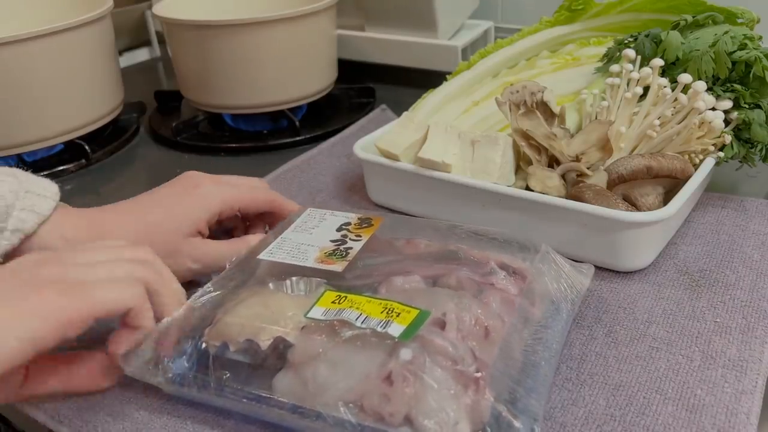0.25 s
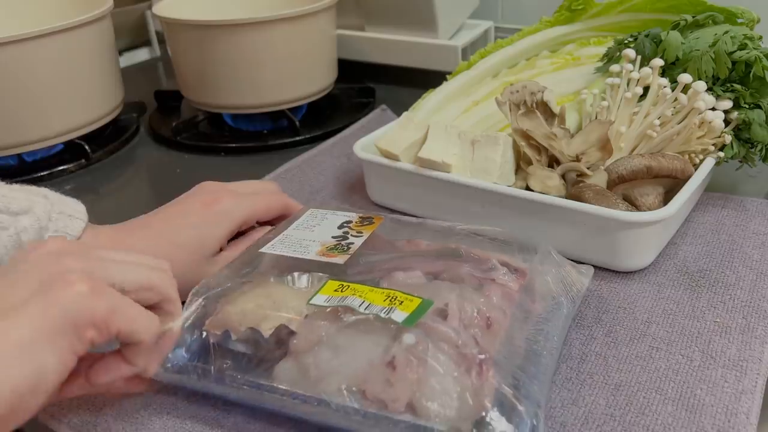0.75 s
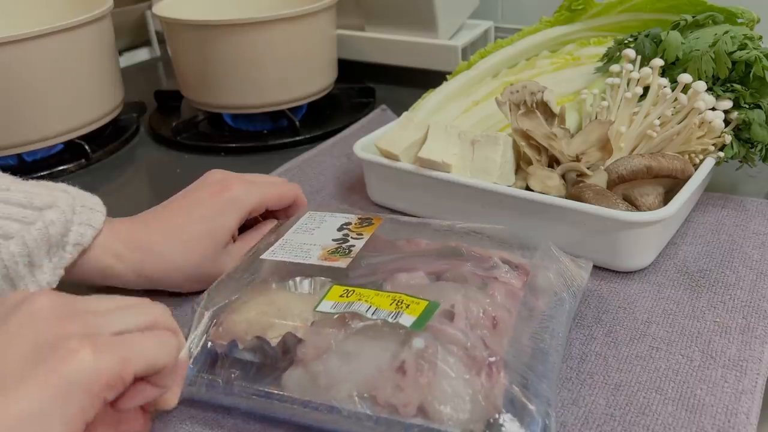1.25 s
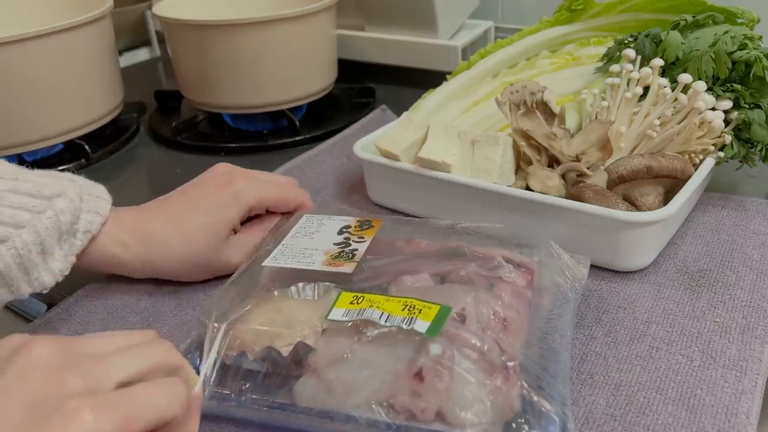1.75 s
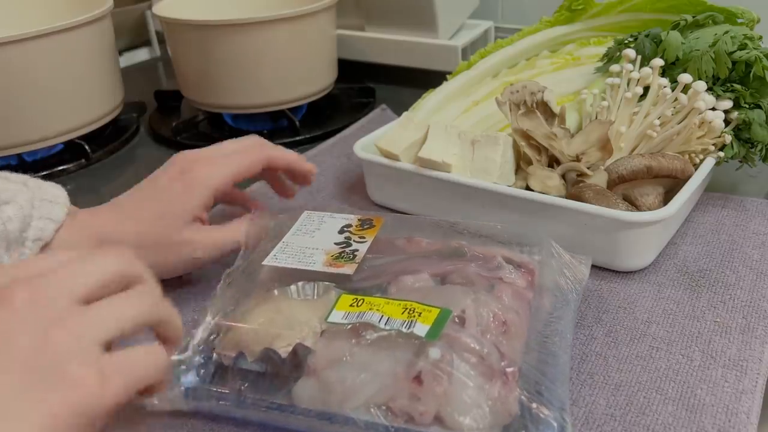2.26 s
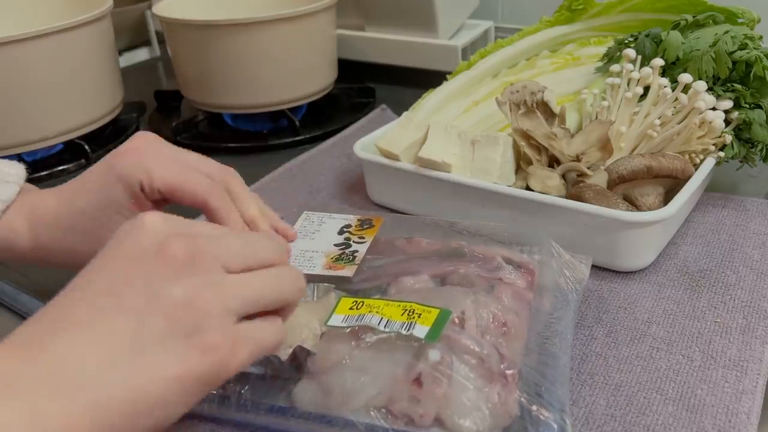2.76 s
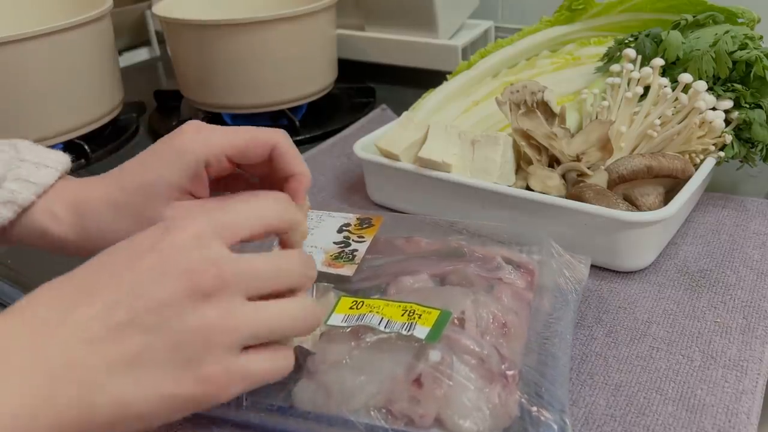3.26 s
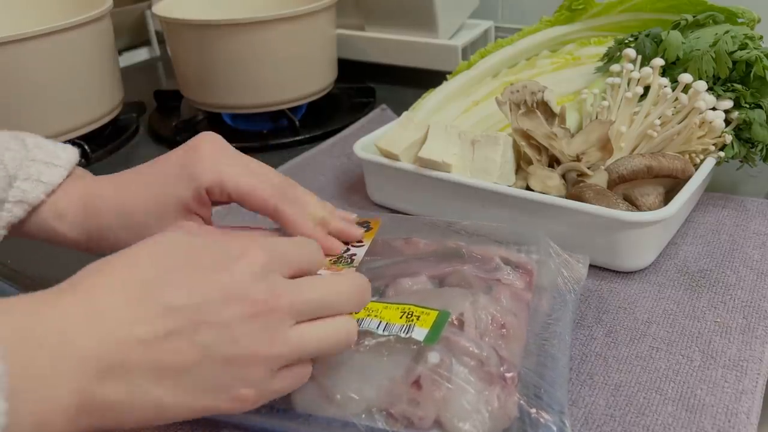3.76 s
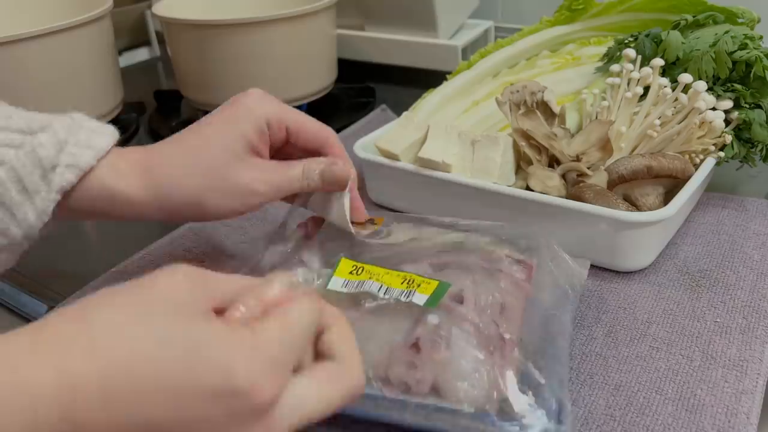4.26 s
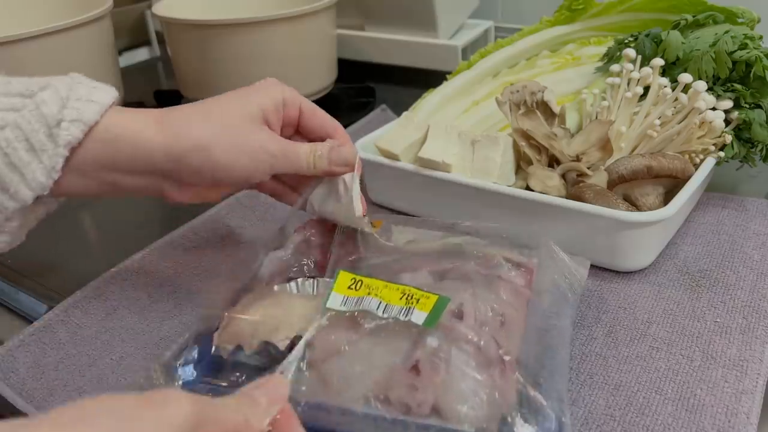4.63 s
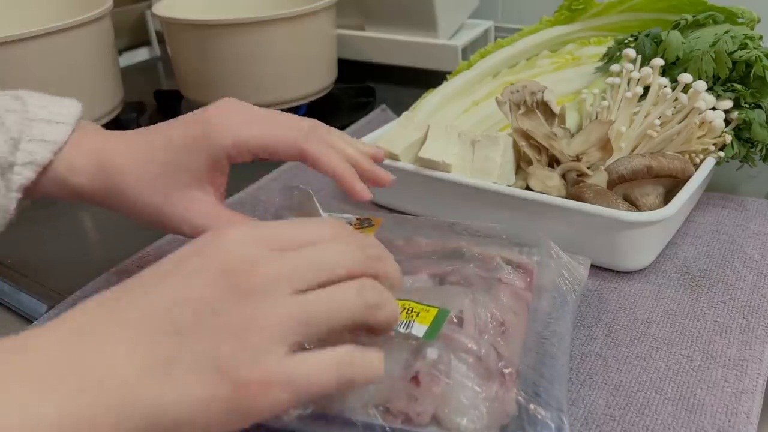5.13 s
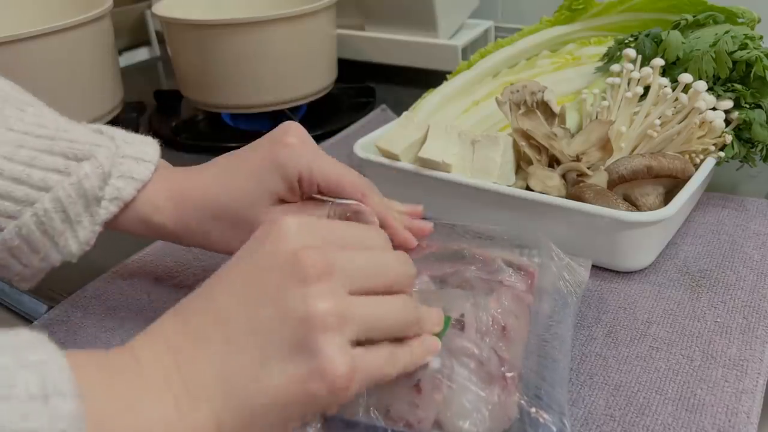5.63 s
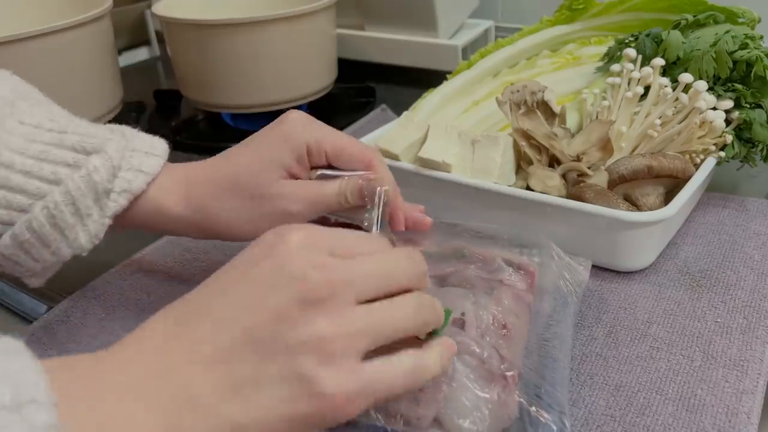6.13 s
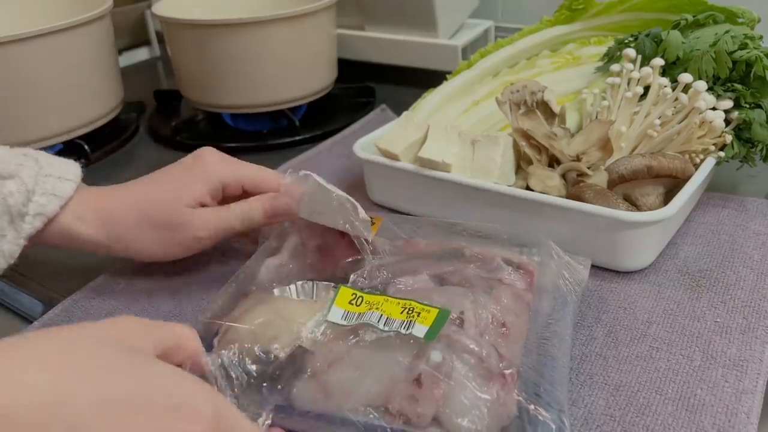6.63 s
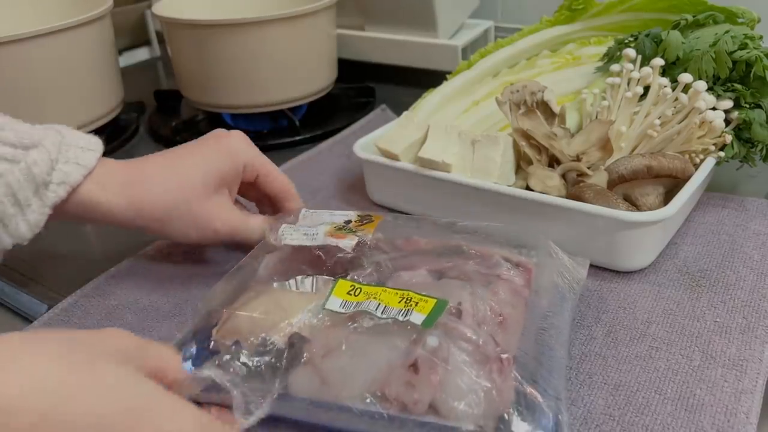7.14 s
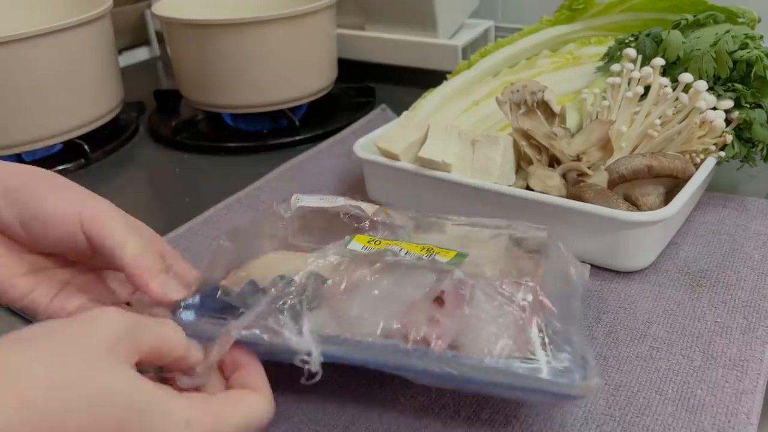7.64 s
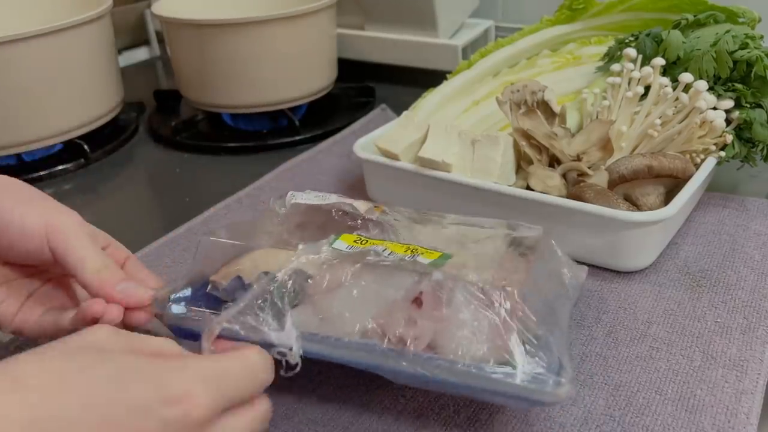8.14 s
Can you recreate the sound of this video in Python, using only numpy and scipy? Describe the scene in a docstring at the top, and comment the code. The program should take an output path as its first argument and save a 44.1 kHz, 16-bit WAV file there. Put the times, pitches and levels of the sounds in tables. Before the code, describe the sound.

Thin plastic wrap crackles brightly while the foam tray beneath rubs, creaks and knocks like a tiny drum. Irregular pulls come in clusters separated by lulls, with crisp snaps, soft fingertip taps, a very short rip and some deeper counter thuds. The sound sits near and slightly left, with a short dry kitchen reflection over quiet steady gas burners.

```python
"""Cling film on a foam tray

Fingers pick and pull at cling film stretched over a foam tray, heard close by on a kitchen counter.
Random slips crinkle the film and rub the tray; runs of impulses rip stuck film loose.
Each release is a film snap, a foam crack, a modal tray ring like a small drum and a thud on the counter.
Filtered noise makes soft gas burners behind; decaying noise tails make the small room's brief answer."""
import sys
import numpy as np
from scipy import signal
from scipy.fft import rfft, irfft, next_fast_len
from scipy.io import wavfile
from scipy.ndimage import uniform_filter1d

SR = 44100
rng = np.random.default_rng(int(sys.argv[2]) if len(sys.argv) > 2 else 0)


def wav_out(sig):
    """Save sig, one row per channel (or a flat mono array), as 16-bit PCM at SR to the path in sys.argv[1]."""
    wavfile.write(sys.argv[1], SR, np.round(np.clip(np.atleast_2d(sig).T, -1, 1) * 32767).astype(np.int16))


N = 369999


def amp(db):
    """Decibels to gain."""
    return 10 ** (np.asarray(db) / 20)


def unit(x):
    """x at rms 1."""
    return x / np.sqrt(np.mean(x ** 2) + 1e-20)


def blow(x):
    """A short sound with the energy of 10 ms at rms 1."""
    return x * np.sqrt(SR / 100 / (np.sum(x ** 2) + 1e-20))


def along(points, hz):
    """(f/Hz, value) points read on a log frequency axis."""
    f, v = np.transpose(points)
    return np.interp(np.log(hz + 1), np.log(f + 1), v)


def curve(rows):
    """(t/s, value) rows as one value per sample."""
    return np.interp(np.arange(N) / SR, *np.transpose(rows))


def filtered(x, response):
    """x times a response of frequency."""
    m = next_fast_len(N + SR // 2)
    hz = np.fft.rfftfreq(m, 1 / SR)
    return irfft(rfft(x, m) * response(hz), m)[..., :N]


def coloured(x, points, size=1024):
    """x through a causal minimum-phase filter with the given spectrum."""
    log_gain = np.log(amp(along(points, np.fft.rfftfreq(size, 1 / SR))))
    cepstrum = irfft(log_gain)
    cepstrum[1:size // 2] *= 2
    cepstrum[size // 2 + 1:] = 0
    impulse_response = irfft(np.exp(rfft(cepstrum)))
    return signal.oaconvolve(x, impulse_response)[:len(x)]


def add(track, s, sound):
    """Mix a sound into a track at s seconds."""
    room = track[round(s * SR):][:len(sound)]
    room += sound[:len(room)]


def burst(t, rise, t60):
    """Noise that flares up and dies; rise and t60 in s."""
    return rng.standard_normal(len(t)) * (1 - np.exp(-(t / rise) ** 2)) * amp(-60 * t / t60)


def click(t, rise, t60):
    """A buckle that runs across the film: burst phases over an even spectrum, then a gentler decay."""
    z = rfft(burst(t, rise, t60))
    even = irfft(z / (np.abs(z) + 1e-9), len(t))
    return even * amp(-15 * t / t60)


def slips(rate, spread_db, cap_db):
    """Irregular impulses of either sign, rate/Hz; sizes exponential in dB up to a cap."""
    size = amp(np.minimum(spread_db * rng.exponential(size=N), cap_db))
    struck = rng.random(N) < rate / SR
    return struck * size * rng.choice([-1, 1], N)


# gas flames and kitchen rumble, relative spectrum: f/Hz, level/(dB per Hz)
BURNER_SPECTRUM = [(20, -49.5), (32, -18), (55, -5), (105, -5), (130, -10), (260, -14.5), (700, -30.5),
                   (1150, -20.5), (1800, -21), (2300, -32.5), (5100, -32), (7000, -36.5), (16000, -38.5)]
# left-right likeness of the background: f/Hz, coherence
BURNER_COHERENCE = [(60, 0.98), (240, 0.85), (950, 0.09), (3770, 0.026), (15000, 0.1)]


def burners():
    """Steady gas flames and low kitchen rumble: coloured noise, mid and side weighted for coherence."""
    def mid_side_gains(hz):
        angle = np.arccos(np.clip(along(BURNER_COHERENCE, hz), -1, 1)) / 2
        return amp(along(BURNER_SPECTRUM, hz)) * [np.cos(angle), np.sin(angle)]

    mid, side = filtered(rng.standard_normal((2, N)), mid_side_gains)
    return amp(-57.13) * unit(np.array([mid + side, mid - side]))


# hands hold the wrap, interpolated: t/s, crinkle level/dB, rub level/dB (relative)
HOLDING = [(0, -62.5, -68.5), (1.1, -66, -69.5), (1.9, -78, -74.5), (3.6, -61, -62.5), (4.6, -63.5, -71.5),
           (5.1, -72, -69), (6.2, -62, -60), (7.5, -60, -65), (8.1, -70.5, -73)]
# a finger pulls at the wrap: t/s, length/s, crinkle level/dB, rub level/dB (relative)
PULLS = [(0.038, 0.11, -79, -59), (0.327, 0.04, -48.5, -47.5), (0.783, 0.047, -59, -56.5),
         (1.19, 0.035, -60.5, -63.5), (2.201, 0.099, -47.5, -52), (2.36, 0.018, -54, -53),
         (2.467, 0.12, -97, -59), (2.729, 0.037, -60, -60.5), (2.88, 0.05, -55, -53.5),
         (2.951, 0.055, -48.5, -49.5), (3.229, 0.07, -51, -56.5), (3.395, 0.079, -67, -57),
         (3.715, 0.42, -58.5, -67), (4.259, 0.066, -49.5, -44.5), (4.413, 0.1, -55, -66),
         (4.704, 0.22, -50, -63), (5.456, 0.32, -55.5, -57.5), (6.179, 0.038, -48.5, -46),
         (6.3, 0.023, -55, -49.5), (6.425, 0.16, -63, -53.5), (6.747, 0.1, -55.5, -51.5),
         (7.267, 0.092, -57, -59.5), (8.241, 0.11, -54, -54.5)]
GRIP_S, RELEASE_S, SLACKEN_DB = 0.028, 0.06, 4.5  # build-up, dying away, weakening over the pull


def effort():
    """Levels of crinkle and rub in dB: every pull grips, slackens and lets go, over the holding hands."""
    t = np.arange(N) / SR
    holding = np.array(HOLDING)
    power = np.array([amp(curve(holding[:, [0, k]])) ** 2 for k in (1, 2)])
    for s, length_s, crinkle_db, rub_db in PULLS:
        corners_s = [s - GRIP_S, s, s + length_s, s + length_s + RELEASE_S]
        shape = np.interp(t, corners_s, [0, 1, amp(-SLACKEN_DB), 0])
        power += np.outer(amp([crinkle_db, rub_db]), shape) ** 2
    return 10 * np.log10(power)


# foam tray modes, nominal: f/Hz, level/dB, t60/s
TRAY_MODES = [(276, -2.5, 0.076), (383, -4.5, 0.045), (529, -3, 0.029), (774, -2.5, 0.029),
              (920, -5, 0.023), (1108, -0.5, 0.034), (1209, 1, 0.019), (1500, 0.5, 0.0079)]


def tray_ring(t, pitch_hz, octaves, scatter_db, contact):
    """The tray's modes; the place of the blow favours those near one pitch, a slow contact draws them out."""
    hz, db, t60 = np.transpose(TRAY_MODES)[:, :, None]
    hz = hz * np.exp(0.046 * rng.standard_normal(hz.shape))  # the film's tension retunes the tray
    distance = np.abs(np.log2(hz / pitch_hz)) / octaves
    db = db + scatter_db * rng.standard_normal(hz.shape) - 6 * distance
    sign = (-1) ** np.arange(len(TRAY_MODES))[:, None]
    decay_s = 0.76 * t60 + 9 * contact
    modes = sign * amp(db - 60 * t / decay_s) * np.sin(2 * np.pi * hz * t)
    ring = modes.sum(axis=0) * (1 - np.exp(-(t / contact) ** 2))
    highpass = signal.butter(2, 280, "high", fs=SR, output="sos")  # too small to radiate bass
    return blow(signal.sosfilt(highpass, ring))


# cracking foam, relative spectrum: f/Hz, level/(dB per Hz)
CRACK_SPECTRUM = [(700, -36), (1500, 2), (2200, 1), (3200, -2.5), (4200, -11), (5200, -13.5), (7000, -25),
                  (16000, -58)]


def rub(creases, level_db, count=5):
    """Half of the slips happen under a finger: they tap the tray at one of several places and scrape."""
    t = np.arange(SR // 12) / SR
    place = rng.integers(2 * count, size=N)
    tray_taps = np.zeros(N)
    for k in range(count):
        ring = tray_ring(t, 800, octaves=1.3, scatter_db=-1.0, contact=0.00025)
        tray_taps += signal.oaconvolve(creases * (place == k), ring)[:N]
    drag = uniform_filter1d(np.abs(creases) * (place < count), size=SR // 200)  # each slip slides for 5 ms
    scrape = coloured(drag * rng.standard_normal(N), CRACK_SPECTRUM)
    return amp(level_db - 1.64) * (unit(tray_taps) + amp(-6.0) * unit(scrape))


# crinkling film, relative spectrum: f/Hz, level/(dB per Hz)
FILM_SPECTRUM = [(500, -14), (1500, -5), (2500, -2), (4000, -5.5), (5500, -2), (8800, 1), (10200, -8),
                 (11600, 3.5), (13600, -20), (15400, 0), (17000, -31)]


def crinkle(creases, level_db):
    """Each crease that flips gives a tiny tick of film noise."""
    flutter = burst(np.arange(SR // 80) / SR, rise=0.0003, t60=0.007)
    crispness = rng.random(N)  # some creases hardly tick
    envelope = signal.oaconvolve(np.abs(creases) * crispness, np.abs(flutter))[:N]
    ticks = envelope * rng.standard_normal(N)
    return amp(level_db - 1.23) * unit(coloured(ticks, FILM_SPECTRUM))


def handling():
    """Creases flip faster the harder the film is worked; they sound in both film and tray."""
    crinkle_db, rub_db = effort()
    rate = 340 * amp(0.55 * (np.maximum(crinkle_db, rub_db) + 58))
    creases = slips(rate, spread_db=5, cap_db=17) / np.sqrt(rate)  # even power at any rate
    return rub(creases, rub_db) + crinkle(creases, crinkle_db)


# film releases: t/s, tray pitch f/Hz, then relative levels: counter thud level/dB, tray ring level/dB,
# tray crack level/dB, film snap level/dB
POPS = [(0.0185, 890, -41, -20.5, -24, -25.5), (0.794, 885, -64, -46.5, -47, -51),
        (1.3873, 930, -62.5, -20.5, -19.5, -21.5), (3.5878, 1190, -70, -45, -48, -48),
        (3.965, 1080, -58, -49, -48, -31.5), (3.9858, 1110, -31.5, -32, -33.5, -45),
        (4.0138, 1050, -47, -39.5, -42, -40), (4.1493, 810, -35.5, -23.5, -36.5, -40),
        (4.2503, 1170, -53, -62, -50, -39), (4.3014, 920, -39.5, -37, -40.5, -59),
        (4.503, 686, -48.5, -34.5, -29.5, -45.5), (4.902, 570, -46.5, -41, -37, -32.5),
        (5.3295, 1000, -54, -56, -51.5, -51), (5.5766, 1270, -62, -47, -41.5, -45.5),
        (5.845, 1100, -66, -43, -43.5, -54.5), (5.8954, 750, -30, -21, -23, -62),
        (6.079, 1410, -77.5, -42, -44.5, -48.5), (6.1358, 860, -26.5, -22, -23.5, -32),
        (6.162, 790, -30, -21.5, -41, -63), (6.443, 920, -53, -59, -40.5, -62),
        (6.7402, 634, -46, -41.5, -49, -57), (6.9122, 530, -48.5, -48, -49, -52),
        (7.313, 930, -44.5, -36, -26.5, -21.5), (7.689, 636, -50.5, -45, -45.5, -53),
        (8.0019, 393, -62, -56, -54, -49)]
# film snap, mean relative spectrum: f/Hz, level/(dB per Hz)
SNAP_SPECTRUM = [(1500, -21.5), (4000, -8), (5600, -5), (7200, -8), (8700, -1.5), (10200, -11.5),
                 (11700, -0.5), (13500, -21.5), (15500, -3), (17000, -32)]


def pops():
    """Each release snaps the film, cracks and rings the tray and pushes it on the counter."""
    track = np.zeros(N)
    t = np.arange(SR // 6) / SR
    for s, pitch_hz, thud_db, ring_db, crack_db, snap_db in POPS:
        softness = np.clip((ring_db - snap_db) / 35, 0, 1) ** 2  # with little snap the tray buckles slowly
        contact_s = 0.00054 + 0.0015 * softness
        weight = np.clip((thud_db - ring_db + 8.5) / 12, 0, 1)  # a heavy push sounds deeper
        bounce = np.sin(2 * np.pi * (250 - 110 * weight) * t) * amp(-60 * t / 0.027)
        counter = amp(-21) * np.sin(2 * np.pi * 95 * t) * amp(-60 * t / 0.074)
        thud = (bounce + counter) * (1 - np.exp(-t / 0.017))
        ring = tray_ring(t, pitch_hz, octaves=0.69, scatter_db=4.0, contact=contact_s)
        crack = click(t, rise=contact_s, t60=0.01 + 5 * contact_s)
        snap = click(t, rise=0.00086, t60=0.0046)
        # every fold has its own colour
        fold = [(hz, db + 4.9 * rng.standard_normal()) for hz, db in SNAP_SPECTRUM]
        add(track, s, amp(thud_db) * blow(thud))
        add(track, s, amp(ring_db + 1.0) * ring)
        add(track, s, amp(crack_db - 3.0) * blow(coloured(crack, CRACK_SPECTRUM)))
        add(track, s, amp(snap_db - 1.0) * blow(coloured(snap, fold)))
    return track


# fingertip landings on the tray: t/s, tray pitch f/Hz, ring level/dB
TAPS = [(0.1657, 860, -48), (0.242, 715, -50.5), (0.2906, 540, -41), (0.4532, 596, -49), (0.6388, 596, -51),
        (0.7832, 920, -48), (1.194, 860, -55.5), (2.478, 880, -51.5), (2.535, 880, -52.5),
        (2.989, 885, -41.5), (4.449, 610, -37), (5.17, 836, -50), (5.5165, 1170, -49.5), (5.6541, 960, -48),
        (5.8052, 815, -46.5), (6.098, 594, -37), (6.2106, 505, -39), (6.5157, 316, -42), (6.557, 745, -46),
        (6.655, 720, -47.5)]
TAP_CONTACT_S, TAP_CRACK_DB, TAP_THUD_DB = 0.001, -12.5, -9  # levels relative to the ring


def taps():
    """A soft fingertip rings the tray and nudges it; the foam hardly cracks and the film stays taut."""
    track = np.zeros(N)
    t = np.arange(SR // 8) / SR
    for s, pitch_hz, db in TAPS:
        ring = tray_ring(t, pitch_hz, octaves=0.67, scatter_db=1.0, contact=TAP_CONTACT_S)
        crack = blow(coloured(click(t, rise=TAP_CONTACT_S, t60=0.019), CRACK_SPECTRUM))
        thud = blow(np.sin(2 * np.pi * 215 * t) * amp(-60 * t / 0.027) * (1 - np.exp(-t / 0.0071)))
        add(track, s, amp(db) * (ring + amp(TAP_CRACK_DB) * crack + amp(TAP_THUD_DB) * thud))
    return track


# film unsticking in quick runs of snaps: t/s, length/s, relative level/dB
RIPS = [(4.267, 0.0044, -45), (4.772, 0.0099, -27.5), (4.783, 0.0018, -29.5), (4.798, 0.011, -39.5),
        (6.313, 0.011, -44)]


def rips():
    """Stuck film tears loose in short runs of snaps, thousands a second."""
    run = np.zeros(N)
    for s, length_s, db in RIPS:
        snaps = slips(2500, spread_db=0.5, cap_db=8)[:round(length_s * SR)]
        add(run, s, amp(db) * unit(snaps))
    return 2.15 * coloured(run, FILM_SPECTRUM)


# strength of the room's answer: f/Hz, level/dB
ROOM_LEVEL = [(150, -10.5), (420, -5), (950, -8.5), (2500, -6), (7000, -5.5), (13000, -4.5)]
# decay of the room: f/Hz, t60/s
ROOM_DECAY = [(150, 0.34), (600, 0.16), (1500, 0.17), (5000, 0.18), (14000, 0.091)]


def kitchen(x, shared, count=5):
    """Short echoes from counter and walls: decaying stereo noise tails that crossfade in turn each second."""
    x = filtered(x, lambda hz: amp(along(ROOM_LEVEL, hz)))
    wet = np.zeros((2, N))
    for k in range(count):
        left, right, both = rng.standard_normal((3, SR // 3))
        noise = np.array([left, right]) + shared * both
        hz, t, z = signal.stft(noise, SR, nperseg=256)
        decay = amp(-60 * t / along(ROOM_DECAY, hz)[:, None])
        tail = signal.istft(z * decay, SR, nperseg=256)[1]
        tail = tail * (1 - np.exp(-(np.arange(tail.shape[1]) / SR / 0.0018) ** 2))
        phase = (np.arange(N) / SR + k / count) % 1
        share = np.clip(count * np.abs(2 * phase - 1) - (count - 2), 0, 2) / 2
        send = (x * np.sqrt(share))[None]
        wet += signal.oaconvolve(send, tail / np.linalg.norm(tail[0]), axes=1)[:, :N]
    return wet


# handling, left over right: f/Hz, level/dB
LEFT_OVER_RIGHT = [(100, -3), (300, 4.5), (700, 0.5), (1300, 5.5), (2400, 3.5), (4400, 10), (6500, 4.5),
                   (9000, 0.5), (15000, 0)]
# phase lead of the left microphone: f/Hz, phase/rad
LEFT_LEAD = [(100, 0), (1200, 0.57), (2000, 1.58), (3000, 2), (4500, 0.97), (6000, 1.62), (8000, 1.48),
             (10200, -3.5), (12000, -5), (15200, -11)]


def placed(x):
    """The hands work left of centre: the two microphones differ in level and phase."""
    half = np.array([[0.5], [-0.5]])

    def response(hz):
        return amp(half * along(LEFT_OVER_RIGHT, hz)) * np.exp(1j * half * along(LEFT_LEAD, hz))

    return filtered(x, response)


def scene():
    """Tray and film in the room, over the burners."""
    wrap = handling() + pops() + taps() + rips()
    return burners() + placed(wrap) + kitchen(wrap, shared=0.59)


CEILING, TOP_HZ = 0.72, 16000  # full scale = 1; band limit


def record(dry):
    """Round off the highest peaks, then cut steeply above the band limit."""
    held = dry / (1 + (dry / CEILING) ** 6) ** (1 / 6)
    return filtered(held, lambda hz: 1 / (1 + (hz / TOP_HZ) ** 120))


dry = scene()
out = record(dry)
wav_out(out)
```